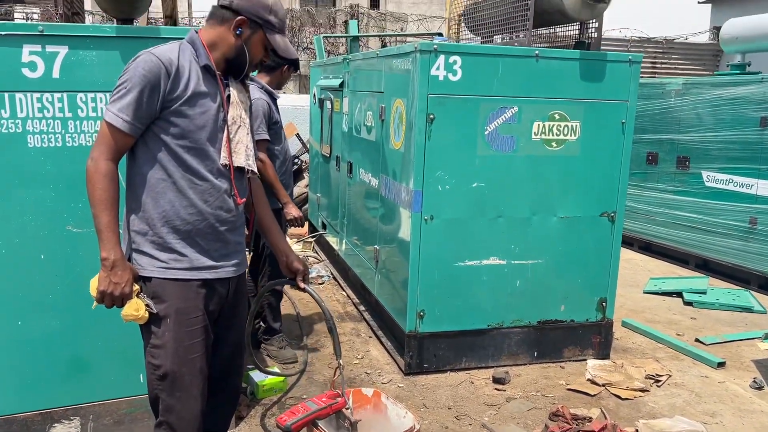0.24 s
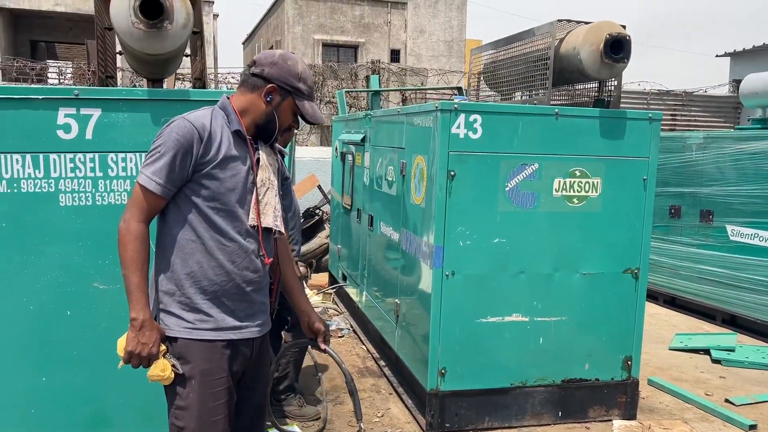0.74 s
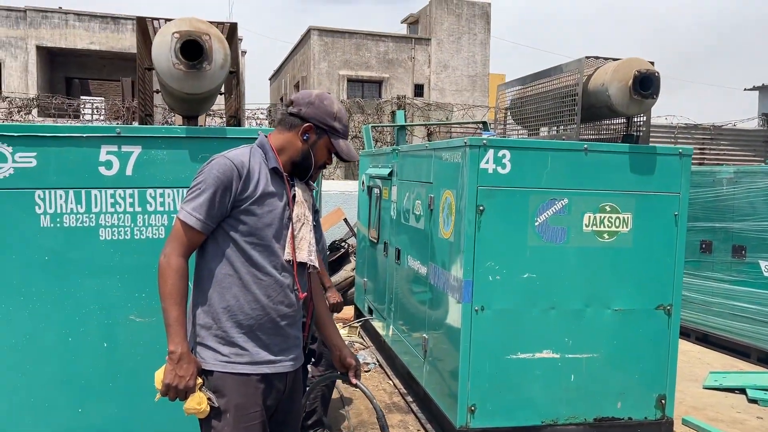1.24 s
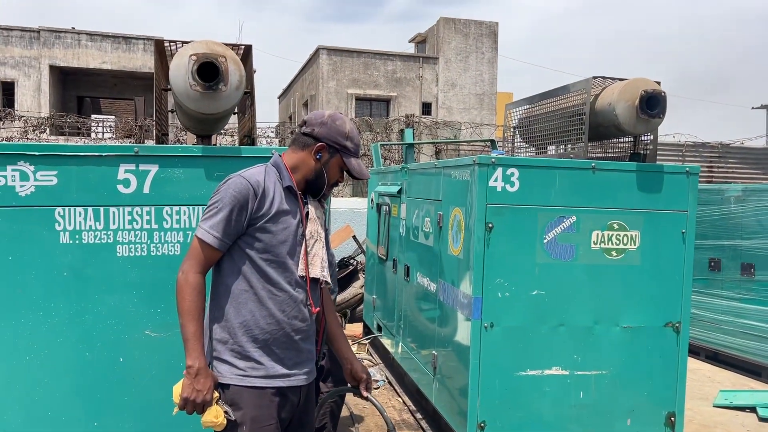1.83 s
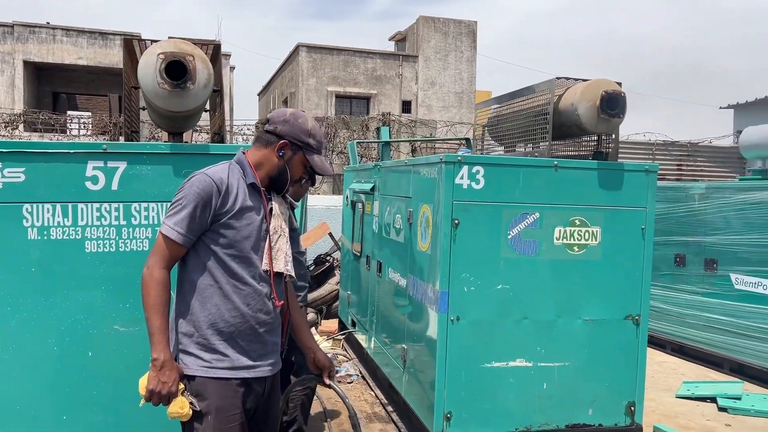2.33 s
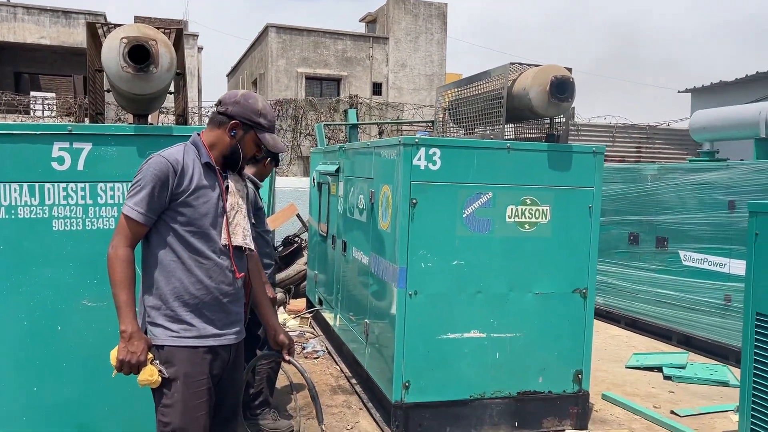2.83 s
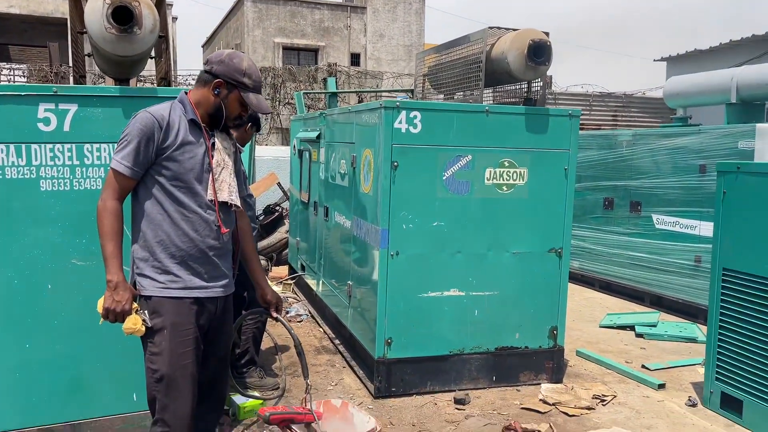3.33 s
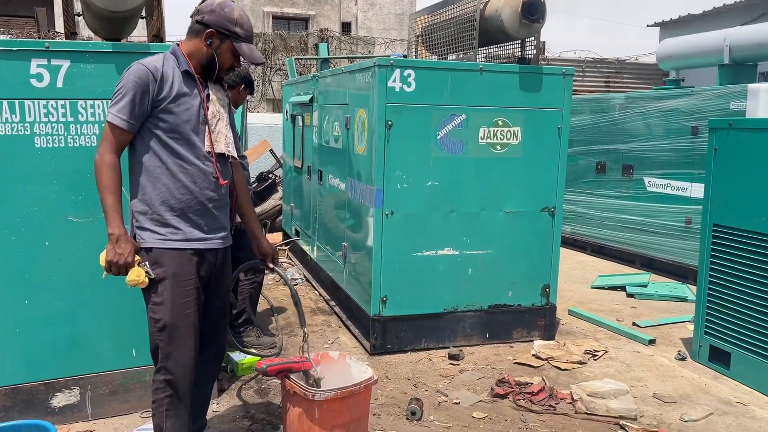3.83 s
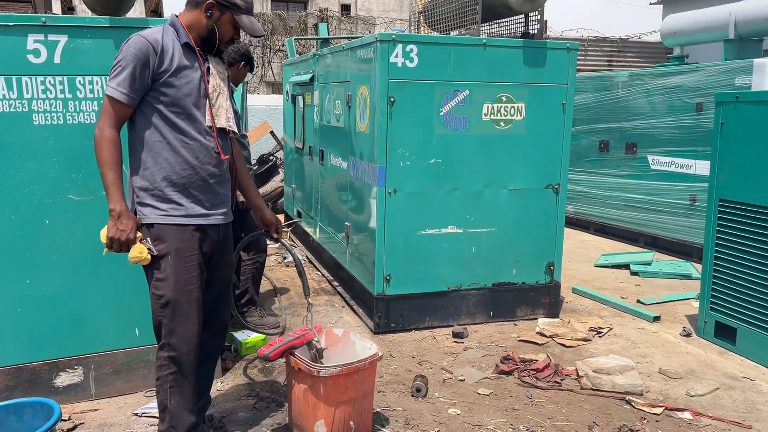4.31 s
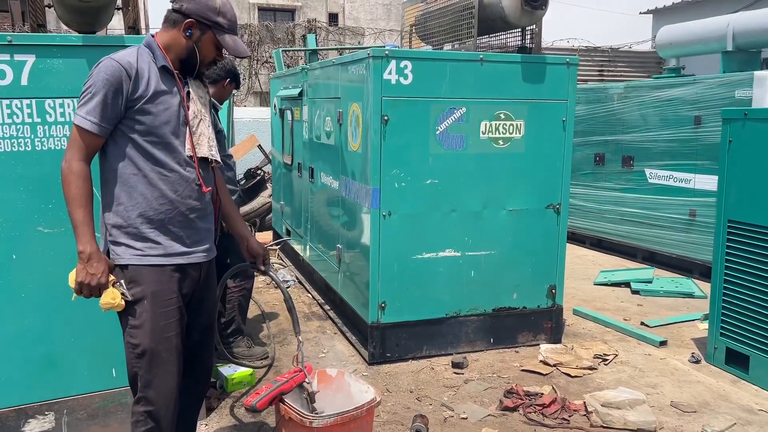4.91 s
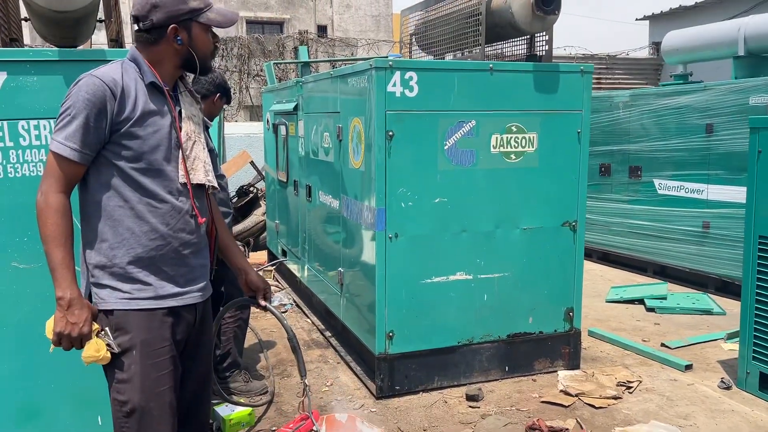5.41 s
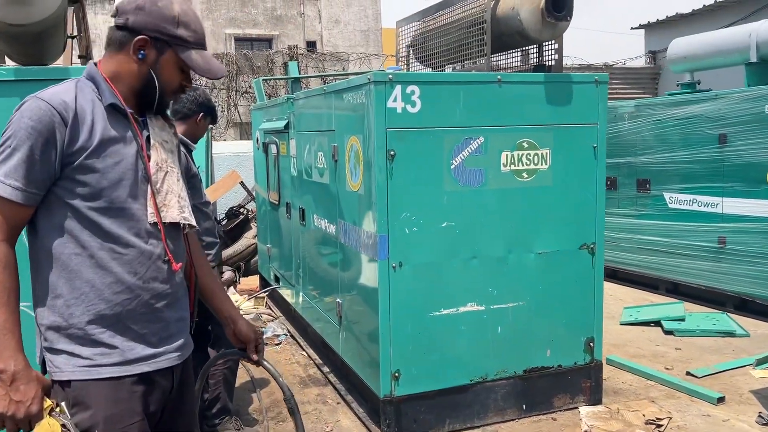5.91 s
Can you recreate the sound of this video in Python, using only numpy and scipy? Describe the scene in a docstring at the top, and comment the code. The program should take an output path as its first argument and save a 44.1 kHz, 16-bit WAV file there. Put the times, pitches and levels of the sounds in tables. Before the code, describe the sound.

Steady engine drone outdoors at close range: a very low humming throb around a hundred hertz, overlaid with soft airy hiss and fast diesel clatter through sheet metal. Midway the hum grows fuller, and a low panel ring, a thin whine and a loose rattle surface. Towards the end the hum weakens, the engine picks up very slightly and the noise brightens. Nearby steel walls give short reflections; the stereo image drifts.

```python
"""A four-cylinder diesel generator set runs in its steel canopy in an open yard, heard from a few steps away.
Throughout: exhaust sines locked to the engine cycle, firing bursts of noise, coloured air rush, casing resonances.
The boom starts low and the machine noise dips near 1.3 s; about 3 to 4.5 s the engine slows briefly,
the boom swells and a loose part, a panel and a casing whine ring out.
Then the boom sinks while the noise and engine speed rise; the hand-held microphone pair drifts throughout."""
import sys
import numpy as np
from scipy import signal
from scipy.fft import rfft, irfft
from scipy.io import wavfile

SR = 44100
rng = np.random.default_rng(int(sys.argv[2]) if len(sys.argv) > 2 else 0)


def level_to_linear(level):
    """Convert decibel levels to linear amplitude factors, elementwise."""
    exponent = np.asarray(level, float) / 20
    return 10 ** exponent


def wav_out(sig):
    """Save sig, one row per channel (or a flat mono array), as 16-bit PCM at SR to the path in sys.argv[1]."""
    wavfile.write(sys.argv[1], SR, np.round(np.clip(np.atleast_2d(sig).T, -1, 1) * 32767).astype(np.int16))


N = 271215
TIME_S = np.arange(N) / SR
HZ = np.arange(N // 2 + 1) * SR / N + 1e-3   # offset keeps log(0) away


def rms_one(x):
    """Scale to rms 1."""
    return x / np.sqrt(np.mean(x ** 2) + 1e-20)


def in_time(rows):
    """One interpolated curve per column after the seconds."""
    s, *columns = np.transpose(rows)
    return [np.interp(TIME_S, s, c) for c in columns]


def at_hz(points, column=1):
    """A table column read on a log-frequency axis."""
    points = np.array(points)
    return np.interp(np.log(HZ), np.log(points[:, 0]), points[:, column])


def colour(x, spectrum):
    """Shape the spectrum; rms 1."""
    return rms_one(irfft(rfft(x) * level_to_linear(at_hz(spectrum)), N))


def drift(rate_hz):
    """Slow chance of rms 1: noise through a double-pole low-pass, run at SR / 40."""
    r = np.exp(-80 * np.pi * rate_hz / SR)
    noise = rng.standard_normal(N // 40 + 2002)
    slow = signal.lfilter([1], [1, -2 * r, r * r], noise)[2000:]   # settled part
    return np.interp(np.arange(N) / 40, np.arange(len(slow)), rms_one(slow))


def resonance(x, hz, width_hz):
    """A two-pole ring; rms 1."""
    r = np.exp(-np.pi * width_hz / SR)
    poles = [1, -2 * r * np.cos(2 * np.pi * hz / SR), r * r]
    return rms_one(signal.lfilter([1, 0, -1], poles, x))


def above(x, edge_hz):
    """The part over a soft edge, without phase shift."""
    return irfft(rfft(x) / (1 + (edge_hz / HZ) ** 8), N)


def delayed(x, delay_ms):
    """Read each row a changing time late."""
    late = np.arange(N) - delay_ms * SR / 1000
    return np.array([np.interp(late, np.arange(N), row) for row in x])


def ground_echo(x, delay_ms, share):
    """A dull copy off the ground arrives just after; its notch slides as the microphone moves."""
    dull = signal.sosfilt(signal.butter(2, 900, fs=SR, output="sos"), x)
    return x + share * delayed(dull, delay_ms)


def gap(x, depth, hz=433, width_hz=33):
    """A share of one narrow band, just over the panel ring, is cancelled."""
    r = np.exp(-np.pi * width_hz / SR)
    poles = [1, -2 * r * np.cos(2 * np.pi * hz / SR), r * r]
    band = signal.lfilter([(1 - r * r) / 2, 0, (r * r - 1) / 2], poles, x)
    return x - np.clip(depth, 0, 1) * band


# Echoes off neighbouring cabinets. Each row: mean delay in ms, level in dB.
CABINET_ECHOES = [(2.9, -16.5), (4.3, -16.5), (7.9, -14), (13.3, -18.5)]


def cabinet_echoes(x, sway_ms):
    """Flat steel walls return the upper sound; hand sway changes each path, so the colour keeps shifting."""
    upper = above(x, edge_hz=1080)
    return x + sum(level_to_linear(level_db) * delayed(upper, ms + sway_ms * drift(0.27))
                   for ms, level_db in CABINET_ECHOES)


# Microphone pair. Each row: frequency in Hz, left-right likeness 0-1, left lead in radians when facing,
# left lead in radians when turned away, left over right in dB.
MICROPHONE_PAIR = [(100, 1, 0, 0, 0), (200, 1, 0, -1, -1.5), (280, 1, 0, -1, -2.5),
                   (450, 0.98, -0.22, 0, 0), (900, 1, 0.056, 0.5, -1.5), (1800, 1, 0, 0, 0.5),
                   (2470, 1, 0.29, 1.05, -1.5), (3230, 0.8, 1, 1.75, -2), (3500, 0, -0.24, 1.5, -3),
                   (3900, .45, 0.56, 2.5, -0.5), (4270, 0.9, -1.2, 4, -2.5), (4600, 1, -1.2, 3, -0.5),
                   (5370, 0.3, -1.5, 3.5, -2.5), (5660, .8, -1.2, 5.5, 1), (9000, .8, -1.34, 5.03, -0.5)]


def microphones(direct, scattered, facing):
    """Direct sound is alike in both ports, scattered sound opposed; phase between ports follows the pose."""
    alike = np.clip(at_hz(MICROPHONE_PAIR), 0, 1)
    tilt = level_to_linear(at_hz(MICROPHONE_PAIR, column=4) / 2)
    mid = np.sqrt((1 + alike) / 2) * rfft(direct)
    side = np.sqrt((1 - alike) / 2) * rfft(scattered)
    left = irfft((mid + side) * tilt, N)
    right_facing, right_away = [
        irfft((mid - side) / tilt * np.exp(-1j * at_hz(MICROPHONE_PAIR, column=pose)), N) for pose in (2, 3)]
    facing = np.clip(facing, 0, 1)
    return np.array([left, facing * right_facing + (1 - facing) * right_away])


# Crankshaft speed. Each row: time in seconds, speed in rev per min.
CRANK_SPEED = [(0.0, 1460.4), (0.4, 1454.5), (0.8, 1455.6), (1.2, 1454.6), (1.6, 1455.3), (2.0, 1455.5),
               (2.4, 1457.1), (2.8, 1453.9), (3.2, 1446.6), (3.6, 1450.5), (4.0, 1455.7), (4.4, 1457.6),
               (4.8, 1458.5), (5.2, 1459.9), (5.6, 1460.1), (6.15, 1465.0)]


def engine_cycle():
    """Engine cycles elapsed; one cycle takes two crankshaft turns."""
    start_cycles = -0.163
    return start_cycles + np.cumsum(in_time(CRANK_SPEED)[0]) / (120 * SR)


# Knock strength of the cylinders. Each entry: relative level in dB, in firing order.
CYLINDER_STRENGTH = [0.35, 0.4, -1.2, 0.56]


def knock_bursts(cycle, lag, rise, fall, spread_db):
    """Each firing opens a burst that rises fast and decays until the next; lag, rise, fall in firing gaps."""
    firing = 4 * cycle - lag + 8   # kept positive
    which, since = firing.astype(int), firing % 1
    chance_db = spread_db * rng.standard_normal(400)[which]
    strength_db = np.array(CYLINDER_STRENGTH)[which % 4] + chance_db
    return level_to_linear(strength_db) * (1 - np.exp(-since / rise)) * np.exp(-since / fall)


def engine_noise(cycle, repeat):
    """Two draws of rattle; a share of the power comes back alike on every engine cycle."""
    pattern = rng.standard_normal((2, 3638))[:, (cycle % 1 * 3637.6).astype(int)]
    share = np.clip(repeat, 0, 1)
    return np.sqrt(share) * pattern + np.sqrt(1 - share) * rng.standard_normal((2, N))


# Cooling air and casing rush. Each row: frequency in Hz, relative density in dB per Hz.
RUSH_SPECTRUM = [(25, -6), (50, 18), (80, 15.5), (100, 19.5), (170, 12), (400, 9.5), (600, 2.5),
                 (800, -5.5), (1700, -1), (2600, -7.5), (2800, -12), (4500, -12.5), (6000, -18),
                 (10000, -24.5)]


def air_rush(steady, lift_db, opening_db):
    """Coloured noise; the parts under and over 3.1 kHz are levelled apart."""
    low_db, upper_db = -32.5, -30
    rush = colour(steady, RUSH_SPECTRUM)
    upper = above(rush, edge_hz=3100)
    low_gain = level_to_linear(low_db + lift_db + 0.5 * drift(13))
    return low_gain * (rush - upper) + level_to_linear(upper_db + opening_db) * upper


# Casing resonances. Each row: frequency in Hz, width in Hz, level in dB before the slow swell,
# 1 if only the knock drives it.
CASING_MODES = [(573, 13, -61, 0), (943, 57, -49.5, 0), (1030, 51, -55, 0), (1173, 9.4, -58.5, 0),
                (1664, 33, -59, 0), (1767, 77, -54.5, 0), (2036, 21, -58.5, 0), (2467, 34, -58.5, 0),
                (3940, 49, -61.5, 1), (4630, 200, -61, 1), (5220, 120, -61, 1), (5890, 170, -62.5, 1),
                (6160, 180, -67, 1), (6940, 100, -76, 1), (9300, 8, -79, 0), (9700, 8, -80, 0),
                (9800, 50, -88, 0)]


def casing_rings(cycle, steady, lift_db, opening_db):
    """Steel modes ring under the steady noise or under the firing bursts, each swelling slowly."""
    out = np.zeros((2, N))
    for hz, width_hz, level_db, struck in CASING_MODES:
        drive, follow_db = steady, lift_db
        if struck > 0.5:
            # struck parts answer each firing with a strength of their own
            bursts = knock_bursts(cycle, lag=0.26, rise=0.033, fall=0.33, spread_db=4.5)
            drive, follow_db = rng.standard_normal((2, N)) * bursts, opening_db
        swell_db = follow_db + 0.96 * drift(0.23)
        out += level_to_linear(level_db + swell_db) * resonance(drive, hz, width_hz)
    return out


def swell(quiet_db, loudest_s, rise_db, half_s):
    """A bell-shaped rise over a quiet level, wavering."""
    waver_db = 2 * drift(0.94)
    return quiet_db + rise_db * np.exp(-((TIME_S - loudest_s) / half_s) ** 2) + waver_db


# Low panel, casing whine, loose part. Each row: frequency in Hz, width in Hz.
PASSING_MODES = [(404, 6.4), (2635, 60), (4790, 71)]
# Their swells, same order. Each row: quiet level in dB, loudest time in seconds, rise in dB,
# time from the peak to 1/e of the rise in seconds.
PASSING_SWELLS = [(-50.5, 4.3, 9, 0.5), (-55.5, 4.4, 8.5, 3.1), (-56, 3.4, 7, 1.5)]


def passing_rings(cycle, steady):
    """Three modes each swell once as the listener passes; the swaying path makes their pitch waver."""
    sway_ms = 0.2
    bursts = knock_bursts(cycle, lag=0.32, rise=0.048, fall=0.2, spread_db=1.5)
    rattle = rng.standard_normal((2, N)) * bursts
    out = np.zeros((2, N))
    for (hz, width_hz), row, drive in zip(PASSING_MODES, PASSING_SWELLS, (steady, steady, rattle)):
        ring = resonance(drive, hz, width_hz)
        out += level_to_linear(swell(*row)) * delayed(ring, sway_ms * drift(2.5))
    return out


# Firing knock through the canopy. Each row: frequency in Hz, relative density in dB per Hz.
KNOCK_SPECTRUM = [(300, -5.5), (700, 8), (2000, 9.5), (3200, 10.5), (4400, 2), (6000, -7.5), (8000, -3),
                  (10500, -12.5)]


def firing_knock(cycle, bursts, opening_db):
    """Firing bursts gate partly repeating noise, coloured by the canopy."""
    level_db = -48
    rattle = engine_noise(cycle, repeat=0.082) * bursts
    return level_to_linear(level_db + opening_db) * colour(rattle, KNOCK_SPECTRUM)


# Exhaust tones. Each row: multiple of the engine cycle rate, relative level in dB.
EXHAUST_TONES = [(4, -28), (5, -29), (6, -37), (7, -36), (9, -30), (10, -47.5), (11, -60), (12, -27.5),
                 (13, -62.5), (14, -64), (15, -43.5), (16, -41.5), (17, -38), (18, -61.5), (19, -46.5),
                 (20, -42.5), (22, -46.5), (23, -50.5), (24, -48), (25, -51), (28, -50), (29, -46.5),
                 (30, -48), (32, -56.5), (33, -55), (40, -54)]


def exhaust(cycle, boom_db, others_db, waver_db):
    """Sines locked to the cycle; the silencer booms on the second firing multiple."""
    out = level_to_linear(boom_db + 0.12 * drift(7.3)) * np.cos(16 * np.pi * cycle)
    scatter = rng.uniform(0, 2 * np.pi, 64)
    for order, level_db in EXHAUST_TONES:
        k = round(order)
        # one weak cylinder inverts the in-between tones; their phase swings across the boom resonance
        if k > 12:
            phase = scatter[k]
        elif k % 4 == 0:
            phase = 0.7
        else:
            phase = np.pi + 1 / (k - 8)
        unsteady_db = waver_db * np.sqrt(k) * drift(1.3)   # higher tones are less steady
        angle = 2 * np.pi * k * cycle + 0.22 * unsteady_db + phase
        out += level_to_linear(level_db + others_db + unsteady_db) * np.cos(angle)
    return np.sqrt(2) * out   # rms levels to peak


# The listener's place, as heard. Each row: time in seconds, silencer boom in dB rms,
# lift of the machine noise in dB, facing the set 0-1.
LISTENER_PLACE = [(0.0, -14, 0.4, 0.85), (0.8, -14, 0, 0.67), (1.3, -13.4, -0.65, 0.55),
                  (2.0, -13.0, -0.5, 0.44), (2.5, -11.5, 0, 0.82), (3.2, -10.5, 1.16, 0.9),
                  (4.0, -10, 0.5, 0.84), (4.6, -10.5, 0.5, 0.9), (5.2, -12.0, 1.46, 0.87),
                  (6.15, -14.5, 3, 0.8)]


def scene():
    """Exhaust drone over rush, knock and casing rings."""
    cycle = engine_cycle()
    boom_db, lift_db, facing = in_time(LISTENER_PLACE)
    boom_swing_db = boom_db - boom_db.mean()
    opening_db = 1 * lift_db   # dB of knock and upper rush per dB of lift
    bursts = knock_bursts(cycle, lag=0.32, rise=0.024, fall=0.61, spread_db=1.87)
    steady = engine_noise(cycle, repeat=0.15) * (1 + 0.5 * bursts)

    machine = air_rush(steady, lift_db, opening_db)
    machine += casing_rings(cycle, steady, lift_db, opening_db)
    machine += passing_rings(cycle, steady)
    machine += firing_knock(cycle, bursts, opening_db)

    machine = ground_echo(machine, delay_ms=1.21 + 0.05 * boom_swing_db, share=0.38)
    machine = gap(machine, depth=0.44 + 0.5 * boom_swing_db)   # deepens with the boom
    machine = cabinet_echoes(machine, sway_ms=0.15)
    top_db = -1.5 - 0.8 * boom_swing_db - 0.83 * lift_db   # top dims as boom and machine noise grow
    machine = machine + (level_to_linear(top_db) - 1) * above(machine, edge_hz=8300)
    drone = exhaust(cycle, boom_db, others_db=-1.17, waver_db=0.51)
    return drone + microphones(*machine, facing)


def low_pass(x):
    """Removes everything above the highest recorded frequency."""
    return signal.sosfilt(signal.butter(12, 15720, fs=SR, output="sos"), x)


def record(dry):
    """A steep low-pass cuts the top; a weak high-passed copy is added."""
    stop_hz, top_copy_from_hz, top_copy_db = 11350, 10000, -17
    cut = signal.sosfilt(signal.cheby2(10, 32, stop_hz, fs=SR, output="sos"), dry)
    top_copy = signal.sosfilt(signal.butter(6, top_copy_from_hz, "high", fs=SR, output="sos"), dry)
    return low_pass(cut + level_to_linear(top_copy_db) * top_copy)


dry = scene()
out = record(dry)
wav_out(out)
```